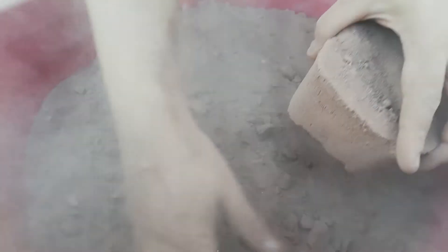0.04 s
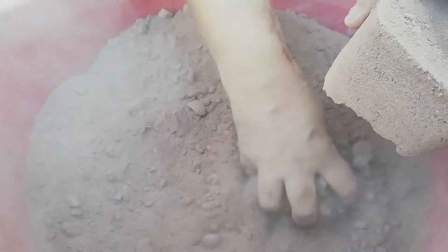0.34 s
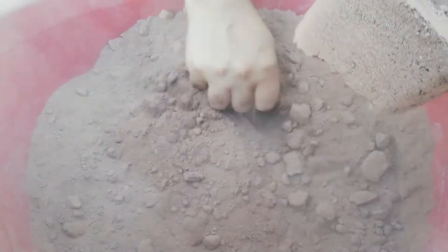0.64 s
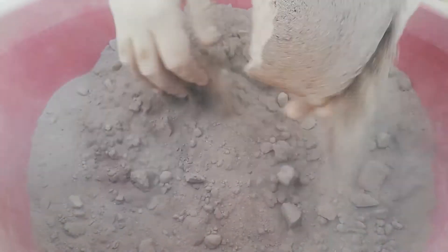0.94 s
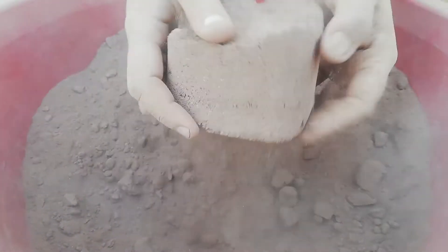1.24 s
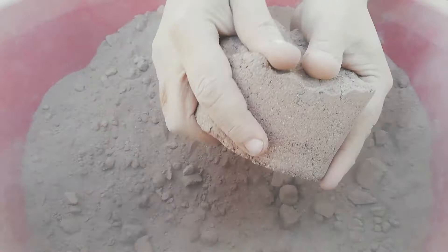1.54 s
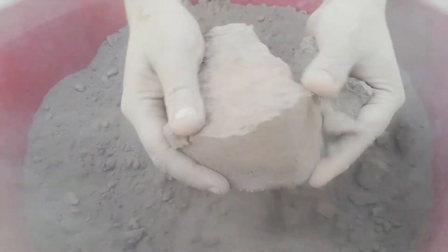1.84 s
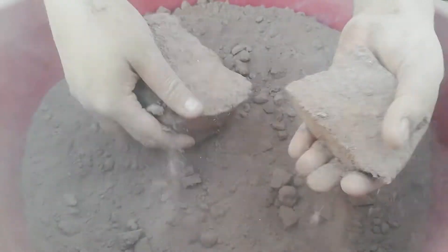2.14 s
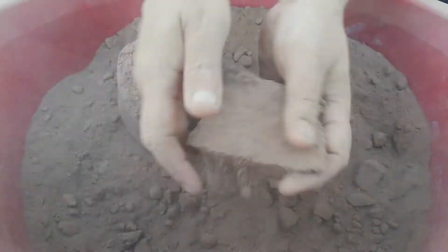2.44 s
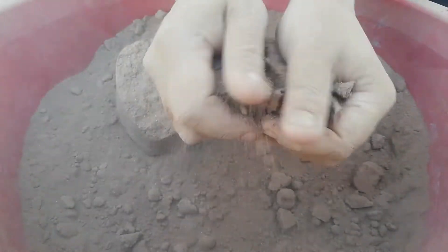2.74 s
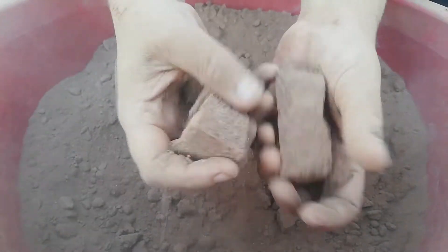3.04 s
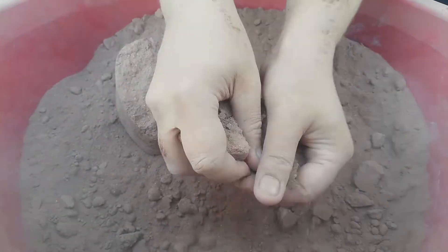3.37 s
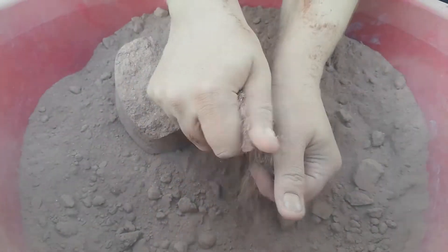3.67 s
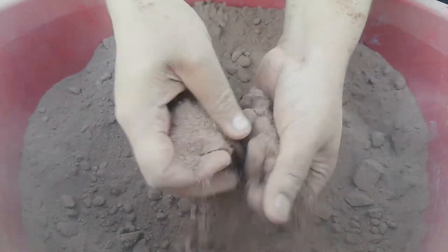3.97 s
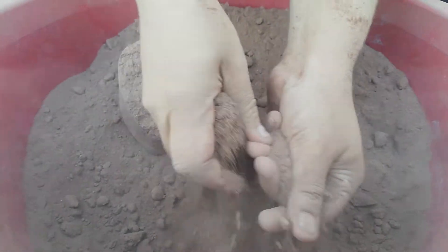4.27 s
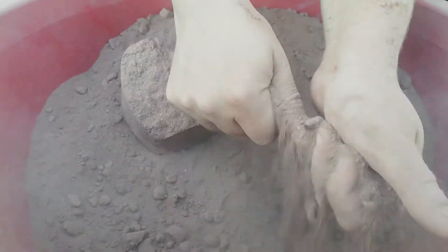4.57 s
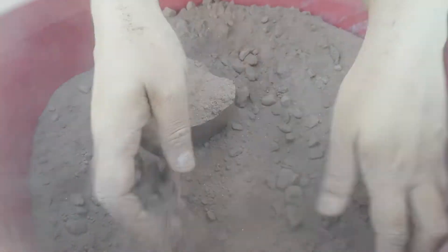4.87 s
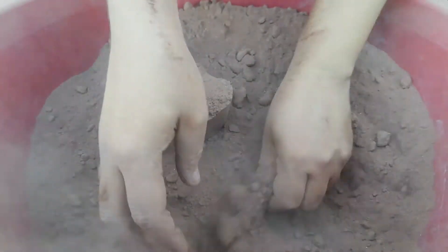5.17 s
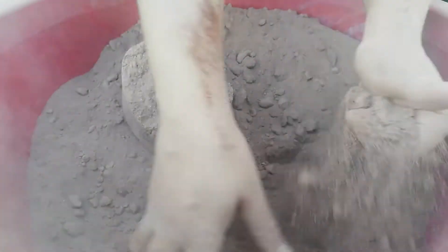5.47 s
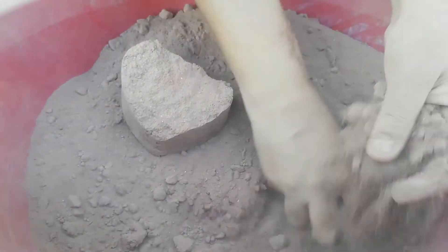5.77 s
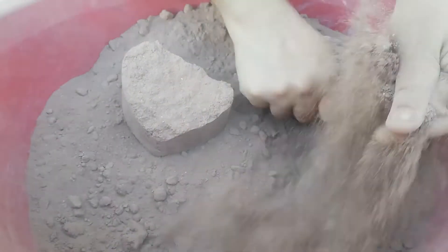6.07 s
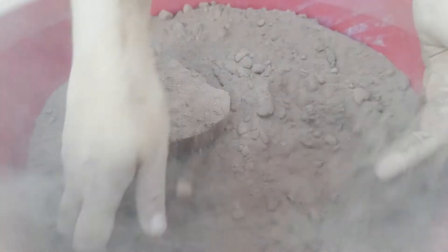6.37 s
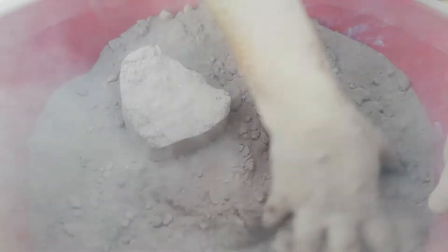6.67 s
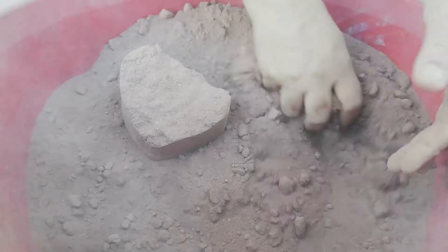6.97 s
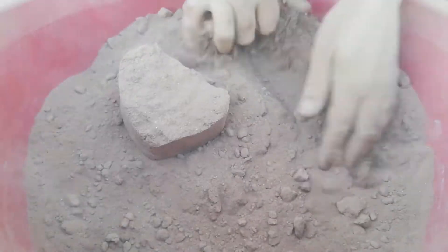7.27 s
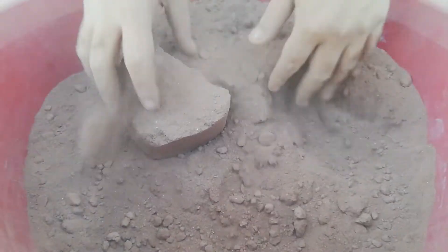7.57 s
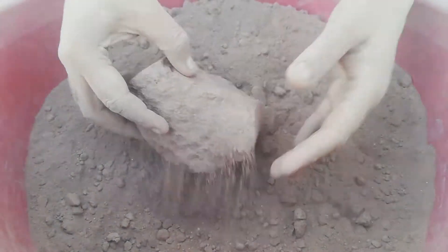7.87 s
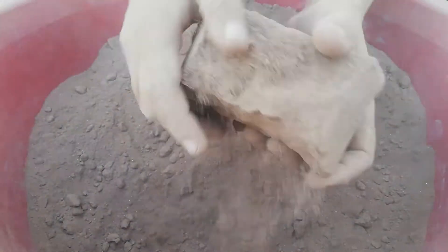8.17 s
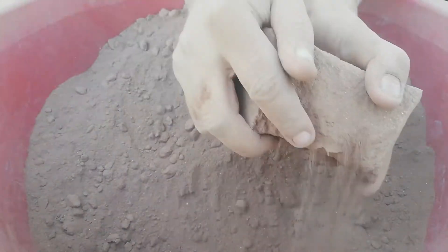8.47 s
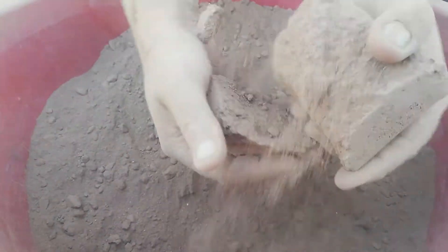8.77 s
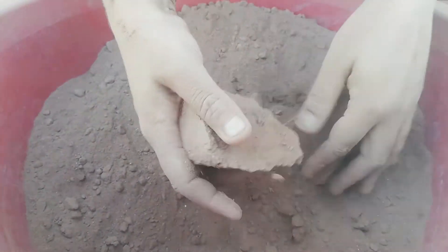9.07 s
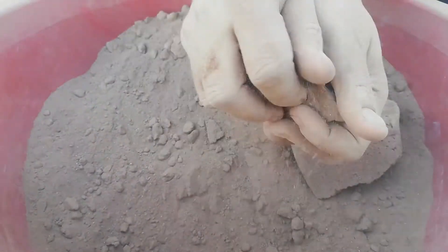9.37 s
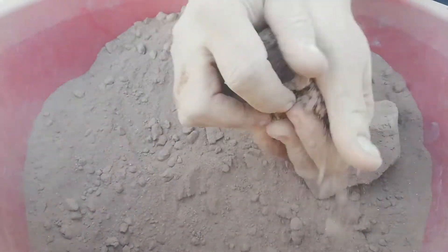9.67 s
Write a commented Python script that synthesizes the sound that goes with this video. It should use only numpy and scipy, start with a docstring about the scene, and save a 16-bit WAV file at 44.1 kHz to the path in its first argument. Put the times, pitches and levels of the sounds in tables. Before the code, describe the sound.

Hands snap and crumble blocks of dry dirt, with gritty crunching and powder trickling into a plastic tub of loose soil.

```python
"""Blocks of dry dirt break and crumble in two hands over a plastic tub of loose soil, in a small room.
Brittle fracture gives a snap, and the damped modes of the block give a short, hollow knock.
Lumps collapse in bursts; sand, grit and crumbs grind and trickle as thousands of random impacts.
Friction adds scrapes and a hiss of powder, and the tub rumbles dully when the hands lean into it.
The sound reaches the two microphone ports of a nearby phone."""
import sys
import numpy as np
from scipy import signal
from scipy.fft import rfft, irfft
from scipy.io import wavfile
from scipy.ndimage import uniform_filter1d

SR = 44100
rng = np.random.default_rng(int(sys.argv[2]) if len(sys.argv) > 2 else 0)


def persist_wave(psi):
    """Save psi, clipped to +-1, as 16-bit WAV."""
    counts = np.round(np.clip(psi, -1, 1) * 32767).astype(np.int16)
    wavfile.write(sys.argv[1], SR, np.atleast_2d(counts).T)


N = 437472
TIME = np.arange(N) / SR
HIT_TIME = np.arange(SR // 4) / SR  # seconds since a contact

# impact spectra of three grain sizes, fine to coarse: frequency_hz, level_db
SAND_SPECTRUM = [(3200, -51), (4600, -5), (5600, -3.5), (7000, -1), (8500, 0), (9900, -6), (12000, -7),
                 (15500, -16.5)]
GRIT_SPECTRUM = [(1200, -0.5), (1700, -8.5), (2100, 0.5), (2500, 1), (3100, 6), (4300, 5), (5200, -1.5),
                 (7000, -5)]
CRUMB_SPECTRUM = [(250, -6.5), (420, -4.5), (660, -8.5), (820, -3), (1150, 1.5), (1500, 0), (1900, -1.5),
                  (2800, -10)]


def undb(db):
    """Amplitude grows tenfold for every 20 dB."""
    return 10 ** (np.asarray(db) / 20)


def curves(table):
    """Linear interpolation in time gives each column a value per sample."""
    times, *columns = np.transpose(table)
    return [np.interp(TIME, times, column) for column in columns]


def gains(spectrum, size):
    """Interpolation in log frequency gives each bin a gain."""
    hz, db = np.transpose(spectrum)
    return undb(np.interp(np.log(np.fft.rfftfreq(size, 1 / SR) + 1e-9), np.log(hz), db))


def colour(x, spectrum):
    """Spectral shaping that falls away beyond its ends and conserves the power of white noise."""
    gain = gains([(spectrum[0][0] / 2, -70), *spectrum, (spectrum[-1][0] * 2, -70)], N)
    return irfft(rfft(x) * gain / np.sqrt(np.mean(gain ** 2)), N)


def noise(size, correlation):
    """Partial coherence: left and right noise have a share of their power in common."""
    white = rng.standard_normal((3, size))
    return np.sqrt(correlation) * white[0] + np.sqrt(1 - correlation) * white[1:]


def band(hz, width_hz, correlation):
    """Modulation shifts low-passed noise to a band whose centre may move; rms 1."""
    slow = signal.sosfilt(signal.butter(2, width_hz / 2, fs=SR, output="sos"), noise(N, correlation))
    return slow / slow.std() * np.sqrt(2) * np.cos(2 * np.pi * np.cumsum(hz * np.ones(N)) / SR)


def wander(rate_hz):
    """Random modulation: straight ramps between Gaussian values."""
    hold = int(SR / rate_hz)
    return 0.93 * uniform_filter1d(np.repeat(rng.standard_normal(N // hold + 1), hold), hold)[:N]


def add(out, start_s, sound):
    """Superposition: a sound joins the mix at its start time."""
    i = max(int(start_s * SR), 0)
    out[:, i:i + sound.shape[-1]] += sound[..., :N - i]


def stroke(length_s, swell_db, attack_s, release_s):
    """Envelope of a hand movement: linear attack, a hold that swells or fades, exponential release."""
    t = np.arange(int((length_s + 6 * release_s) * SR)) / SR
    hold = undb(swell_db * (np.minimum(t / length_s, 1) - .5))
    return np.minimum(t / attack_s, 1) * hold * np.exp(-np.maximum(t - length_s, 0) / release_s)


def grains(rate_hz, spread_db, decay_s, correlation, rise_s=0.00033):
    """Shot noise of mean power 1: brief random contacts, with a few large ones as the spread widens."""
    size = undb(spread_db * np.minimum(rng.exponential(size=N), 5.5))
    energy = (rng.random(N) < rate_hz / SR) * size ** 2
    for seconds in (decay_s, rise_s):
        energy = signal.lfilter([1], [1, -np.exp(-2 / (seconds * SR))], energy)
    return np.sqrt(energy / (uniform_filter1d(energy, SR // 10) + 1e-9)) * noise(N, correlation)


def burst(decay_s, correlation, rise_s=.00006):
    """A transient of unit energy: noise rises quickly and decays exponentially."""
    envelope = np.exp(-HIT_TIME / decay_s) * (1 - np.exp(-HIT_TIME / rise_s))
    x = envelope * noise(len(HIT_TIME), correlation)
    return x / np.sqrt(np.sum(x ** 2, axis=1, keepdims=True))


def ring(modes, skew_rad):
    """Free vibration: a sum of damped modes, each out of phase between the two ports."""
    phases = skew_rad * (1 + rng.standard_normal(len(modes)) / 2)
    return sum(undb(db) * np.exp(-np.log(1000) * HIT_TIME / t60_s)
               * np.sin(2 * np.pi * hz * HIT_TIME - np.array([[0], [phase]]))
               for (hz, db, t60_s), phase in zip(modes, phases))


def far_port(x, lag_samples=13):
    """Arrival-time difference: the right port hears a little later."""
    return np.array([x[0], np.roll(x[1], lag_samples)])


def hiss(level_db=-73):
    """Noise floor: a faint, even hiss lies under the quietest moments."""
    return undb(level_db) * colour(noise(N, correlation=0), [(300, 10), (2000, 18), (9000, -68), (15500, 2)])


def room(x, t60_s=0.25, tail_db=-11.5, cutoff_hz=3500):
    """Reverberation: reflections from near walls merge into a short, dull tail."""
    tail = burst(t60_s / np.log(1000), correlation=0.095, rise_s=0.00067)
    tail = signal.lfilter(*signal.butter(1, cutoff_hz, fs=SR), tail)
    return undb(tail_db) * signal.fftconvolve(x, tail, axes=1)[:, :N]


def tub_levels():
    """Incoherent sources add in power: pushes raise the tub's murmur and rumble, returned in dB."""
    # murmur of settling soil, and deep rumble between pushes: time_s, level_db
    settling = [(0, -63), (1.1, -67), (1.7, -68), (2, -58.5), (3.7, -65), (4.5, -67.5), (5.1, -59.5),
                (5.7, -69), (6.1, -53), (6.5, -64.5), (7, -57.5), (7.7, -65), (8, -52), (8.3, -60.5),
                (9.1, -67.5), (9.9, -58)]
    rumble = [(0, -63.5), (1.7, -65), (4.4, -65), (5.6, -63.5), (7.3, -69), (8.1, -68.5), (9.9, -66.5)]
    # hands leaning into the tub: start_s, length_s, murmur_db, rumble_db, swell_db
    pushes = [(.55, 0.44, -66.5, -61.5, 2), (2.11, 0.22, -61, -57.5, 3), (2.541, 0.37, -52, -51, 2.5),
              (2.957, 0.56, -52.5, -57, -14.5), (3.993, .4, -58.5, -52.5, -16)]
    power = undb(curves(settling) + curves(rumble)) ** 2
    for start_s, length_s, murmur_db, rumble_db, swell_db in pushes:
        envelope = stroke(length_s, swell_db, attack_s=0.019, release_s=0.02)
        add(power, start_s, (undb([[murmur_db], [rumble_db]]) * envelope) ** 2)
    return 10 * np.log10(power)


def tub(murmur_gain_db=2, rumble_gain_db=3, bump_gain_db=-6):
    """Forced and free vibration: shifting soil murmurs, and bumps ring the modes of the loaded tub."""
    # spectra of the murmur and the rumble: frequency_hz, level_db
    murmur_spectrum = [(50, -13), (85, -2), (115, 2), (200, 4.5), (290, -2), (390, -5.5), (550, -23.5),
                       (1000, -17.5)]
    rumble_spectrum = [(12, -42), (30, -0.5), (60, -2.5), (85, -5), (140, -11)]
    # modes of the loaded tub: frequency_hz, level_db, t60_s
    tub_modes = [(33, -61, 0.12), (64.4, -9.5, 0.36), (105.6, 3.5, 0.22), (161.8, 1, 0.32),
                 (194.6, 3.5, 0.124), (257, -5.5, 0.25)]
    # dull bumps against it: start_s, level_db, contact_s
    bumps = [(.888, -15.5, 0.022), (2.558, -37, .0036), (2.795, -27.5, 0.0032), (2.829, -28, .0043),
             (2.976, -28.5, 0.0014), (2.999, -26.5, 0.0018), (3.086, -34, 0.0038), (3.115, -28.5, 0.0047),
             (3.55, -29, 0.018), (4.01, -30.5, 0.0087), (4.127, -33, 0.0015), (4.183, -33.5, 0.0012),
             (7.809, -34, 0.0062)]
    murmur_db, rumble_db = tub_levels()
    soil = grains(rate_hz=900, spread_db=2, decay_s=0.0017, correlation=0.94)
    out = colour(soil, murmur_spectrum) * undb(murmur_db + murmur_gain_db)
    out += colour(noise(N, correlation=1), rumble_spectrum) * undb(rumble_db + rumble_gain_db)
    onset = 1 - np.exp(-HIT_TIME / 0.0015)
    for start_s, level_db, contact_s in bumps:
        detune = 1 + 0.049 * rng.standard_normal(len(tub_modes))
        # a long, soft contact barely excites the upper modes and shortens the ring
        modes = [(hz * d, db - 20 * np.log10(1 + (hz * contact_s) ** 2), t60 / np.hypot(1, 100 * contact_s))
                 for (hz, db, t60), d in zip(tub_modes, detune)]
        add(out, start_s, undb(level_db + bump_gain_db) * ring(modes, skew_rad=0.17) * onset)
    return out


def faint_ring(start_s=1.855, gain_db=-52, waver_db=13):
    """Amplitude-modulated modes: a thin, unsteady ring hangs on after the first block parts."""
    # modes of the ring: frequency_hz, level_db, t60_s
    modes = [(563, 0.5, 0.28), (1670, 1, 0.12), (2420, 2, 0.28), (2977, 8, 0.12)]
    out = np.zeros((2, N))
    add(out, start_s, undb(gain_db) * ring(modes, skew_rad=1) * (1 - HIT_TIME / HIT_TIME[-1]))
    return out * undb(waver_db * wander(rate_hz=90))


def scrapes(rough_db=2):
    """Stick-slip friction: fingers jerk through the dirt and excite the cavity of the palm."""
    # drags under a cupped hand: middle_s, length_s, level_db, cavity_hz, width_hz
    drags = [(0.217, 0.13, -53, 1015, 503), (0.57, 0.12, -54.5, 938, 405),
             (2.635, 0.022, -40.5, 3200, 2000), (3.304, 0.18, -52, 920, 200), (3.507, .05, -44, 4000, 596),
             (3.93, 0.023, -41.5, 2980, 1800), (7.116, 0.11, -51.5, 2970, 900),
             (9.546, 0.034, -37.5, 3220, 2230), (7.034, 0.19, -52.5, 1336, 222),
             (7.795, 0.067, -47.5, 1426, 304), (7.973, 0.094, -46, 1156, 300),
             (9.415, 0.038, -38, 1118, 330), (9.785, 0.037, -51, 1306, 400),
             (9.793, 0.056, -46, 2750, 2000)]
    jerks = undb(rough_db * wander(rate_hz=120))
    out = np.zeros((2, N))
    for middle_s, length_s, level_db, cavity_hz, width_hz in drags:
        envelope = np.exp(-2 * ((TIME - middle_s) / length_s) ** 2)
        out += undb(level_db) * envelope * band(cavity_hz, width_hz, correlation=0.28)
    return jerks * out


def sliding():
    """Cavity resonance: the gap between two sliding faces picks a moving band from the powder's hiss."""
    # course of the slide: time_s, level_db, resonance_hz
    slide = [(3.13, -51, 4330), (3.165, -33.5, 4390), (3.22, -38, 4800), (3.29, -38, 7400),
             (3.34, -28.5, 7080), (3.39, -28.5, 5480), (3.43, -29.5, 6800), (3.47, -31.5, 7800),
             (3.55, -47, 8500)]
    level_db, resonance_hz = curves(slide)
    touching = (TIME > slide[0][0]) & (TIME < slide[-1][0])
    return touching * undb(level_db) * band(resonance_hz, width_hz=1800, correlation=0)


def powder_sizzle(x, shelf_hz=9800):
    """High shelving: the very top rises and dips with puffs of the finest powder."""
    # slow drift of the shelf: time_s, gain_db
    drift = [(0, -0.5), (1.2, -3.5), (3, -2), (5.2, -4), (7.6, -3), (8.15, -8), (9, -2.5), (9.9, 0)]
    # puffs, and one lull: start_s, length_s, lift_db
    puffs = [(3.142, 0.52, 6.5), (7.77, 0.19, 10), (9.537, 0.089, -10), (9.675, 0.14, 12)]
    lift = np.ones((1, N))
    for start_s, length_s, lift_db in puffs:
        add(lift, start_s, (undb(lift_db) - 1) * stroke(length_s, 0, attack_s=0.096, release_s=0.0078))
    top = signal.sosfiltfilt(signal.butter(4, shelf_hz, "high", fs=SR, output="sos"), x)
    return x + (undb(curves(drift)) * lift - 1) * top


def hand_shadow(x, depth_db=2.5):
    """Shadowing and reflection by the moving hands send soft peaks and dips through the spectrum."""
    frames = signal.stft(x, nperseg=256)[2]
    shade = uniform_filter1d(rng.standard_normal(frames.shape), size=70, axis=2)  # smooth in time
    shade = uniform_filter1d(shade, size=2, axis=1)  # and in frequency
    return signal.istft(frames * undb(depth_db * shade / shade.std()))[1][:, :N]


def grain_mix(sand_db, coarse_db, grit_lift_db=0, grit_follows=0.26):
    """Size distribution as gains of sand, grit and crumbs; coarse_db is crumbs over sand."""
    return undb(sand_db + np.array([[0], [grit_lift_db + grit_follows * coarse_db], [coarse_db]]))


def flow_levels():
    """Rubs, pours and trickle add in power, giving levels of sand, grit and crumbs in dB."""
    # loose dirt trickling between strokes: time_s, sand_db
    trickle = [(0, -61.5), (.9, -63), (1.4, -65), (2.1, -60.5), (2.8, -63), (2.95, -78), (3.1, -64.5),
               (3.65, -66), (4.4, -59.5), (6.5, -58.5), (7.4, -60.5), (8.7, -63.5), (8.92, -64),
               (9.12, -59.5), (9.25, -65.5), (9.9, -66)]
    # fingers and blocks rubbing off sand: start_s, length_s, sand_db, coarse_db, swell_db
    rubs = [(1.1, 0.14, -55, -25, 5), (1.215, .14, -45.5, -25, 2), (1.44, 0.064, -55, -28, 8),
            (1.505, 0.18, -42, -20, -6.5), (2.02, 0.17, -50, -7, 11), (2.226, 0.098, -45.5, -10.5, -14),
            (2.33, 0.16, -48.5, -11, 1), (3.145, .39, -38, -18, -5), (3.92, 0.21, -51.5, -1.5, -8),
            (4.17, 0.2, -44, -17, 8.5), (4.41, 0.24, -48.5, -8, -5.5), (4.645, 0.28, -46, -13, -12.5),
            (4.98, 0.11, -46, -17.5, 0), (5.14, 0.029, -47, -15, 4), (5.36, 0.054, -52.5, -7, 6),
            (5.465, 0.09, -48, -41, -6), (5.6, 0.038, -52.5, -35, 7), (5.68, 0.23, -59.5, -25, 4),
            (6.93, 0.21, -51, -6, -8), (7.25, .07, -56, -6, -2), (8.96, 0.13, -51.5, -28, 3)]
    # handfuls raked up, crushed or poured: start_s, length_s, sand_db, coarse_db, swell_db
    pours = [(0, 0.096, -60, -3, -22), (.15, 0.1, -59, -3, -5), (.35, 0.096, -55.5, 1, 10),
             (.48, 0.15, -59, 5, 5.5), (.72, .15, -62.5, -2, 7), (1.72, .13, -55.5, 2.5, -9),
             (2.52, 0.11, -59, 5, -12), (2.64, 0.048, -53, -0.5, 9.5), (2.83, 0.061, -58.5, -1, -4),
             (5.18, 0.073, -56, 4.5, 6), (5.905, 0.055, -45, -5, 5.5), (6.02, 0.41, -57.5, 4, -9),
             (6.6, .26, -59.5, 1, 6), (7.48, 0.23, -68.5, 9.5, 10), (7.78, 0.39, -54.5, 7, -3.5),
             (8.16, 0.43, -62, 6.5, -2), (9.26, 0.059, -59, 3, 11), (9.305, 0.16, -50, 0.5, 6.5),
             (9.48, 0.22, -56, 6.5, -12.5), (9.69, 0.19, -57.5, 5.5, -3.5)]
    power = grain_mix(curves(trickle)[0], coarse_db=-4.5) ** 2
    for moves, grit_lift_db, attack_s, release_s in ((rubs, -0.5, 0.013, 0.01), (pours, 0, 0.0063, 0.02)):
        for start_s, length_s, sand_db, coarse_db, swell_db in moves:
            envelope = stroke(length_s, swell_db, attack_s, release_s)
            add(power, start_s, (grain_mix(sand_db, coarse_db, grit_lift_db) * envelope) ** 2)
    return 10 * np.log10(power)


def grinding(chip_share=0.18, slip_db=1.87, thin_flow_db=-58):
    """Granular flow: sand, grit and crumbs collide in small slips; chips tick across all three ranges."""
    sand_db, grit_db, crumb_db = flow_levels()
    # single grains stand out of a thin flow and merge in a thick one
    spread_db = np.maximum(2.6 - 0.06 * (sand_db - thin_flow_db), 0)
    chips = np.sqrt(chip_share) * grains(1100, 1.07 * spread_db, decay_s=.0008, correlation=.2)

    def stream(spectrum, rate_hz, decay_s, correlation):
        """Impacts of one grain size share a spectrum with the chips."""
        impacts = np.sqrt(1 - chip_share) * grains(rate_hz, spread_db, decay_s, correlation)
        return colour(chips + impacts, spectrum)

    sand = stream(SAND_SPECTRUM, rate_hz=7000, decay_s=.0005, correlation=.02) * undb(sand_db + 2.5)
    grit = stream(GRIT_SPECTRUM, rate_hz=3500, decay_s=.00046, correlation=.04) * undb(grit_db + 2)
    crumbs = stream(CRUMB_SPECTRUM, rate_hz=1400, decay_s=.003, correlation=.24) * undb(crumb_db + 1)
    return hand_shadow(far_port(sand + grit) + crumbs) * undb(slip_db * wander(rate_hz=55))


def soil_thud(x):
    """A soft impact holds mostly low frequencies."""
    # a lump hitting soil: frequency_hz, level_db
    thud_spectrum = [(100, -34), (220, 6.5), (380, 5), (600, -10), (1100, -19)]
    return colour(x, thud_spectrum)


def crushes(rise_s=0.0029):
    """Granular avalanche: a lump gives way in a rush of impacts that swells quickly and runs out."""
    # lumps collapsing: start_s, crunch_db, crumb_db, thud_db, decay_s
    collapses = [(0.164, -61, -45, -44, 0.014), (0.3286, -43.5, -45, -46, 0.02),
                 (1.527, -34.5, -66, -74, 0.029), (2.23, -34, -33, -32, 0.011),
                 (2.623, -45, -43.5, -36, 0.032), (3.922, -42, -41, -50, .016),
                 (4.08, -30.5, -66, -65, .013), (4.4364, -27, -36.5, -66, 0.02),
                 (4.651, -32, -44, -43, 0.018), (4.904, -29, -46, -40.5, 0.027),
                 (4.951, -31, -54, -42.5, 0.021), (5.756, -37.5, -69, -73, 0.013),
                 (5.9108, -31.5, -37, -59, 0.015), (7.787, -53, -73, -49, 0.034),
                 (8.963, -34, -49, -69, 0.0099), (9.323, -36.5, -38, -64, 0.034),
                 (9.414, -36, -40, -67, 0.022), (9.459, -35, -33, -65, 0.0087),
                 (9.714, -34.5, -44, -64, .01)]
    drives = np.zeros((3, N))
    for start_s, crunch_db, crumb_db, thud_db, decay_s in collapses:
        envelope = (1 - np.exp(-HIT_TIME / rise_s)) * np.exp(-(HIT_TIME / decay_s) ** 2)
        add(drives, start_s, undb([[crunch_db], [crumb_db], [thud_db]]) * envelope)
    crunch, crumbs, thuds = (drive * grains(rate_hz=5800, spread_db=0, decay_s=0.001, correlation=0.14)
                             for drive in drives)
    treble = undb(-5) * colour(crunch, SAND_SPECTRUM) + undb(-7) * colour(crunch, GRIT_SPECTRUM)
    return far_port(treble) + undb(-2) * colour(crumbs, CRUMB_SPECTRUM) + undb(-1) * soil_thud(thuds)


def cracks(tear_s=0.0016, block_t60_s=0.013, knock_rise_s=0.0019):
    """Brittle fracture: a crack ticks, tears on, sheds dust and rings the block; pieces clack and thud."""
    # blocks snapping and fragments striking: start_s, snap_db, knock_db, pitch_hz, thud_db
    fractures = [(0.2676, -37.5, -58, 1115, -59), (0.402, -46, -63, 1490, -53),
                 (.5778, -53, -42, 1250, -46), (1.723, -24, -28, 1260, -73),
                 (1.7404, -26, -25.5, 1370, -60), (1.761, -26.5, -26, 1120, -59),
                 (1.7683, -31, -33, 870, -42), (1.775, -25, -28.5, 880, -43),
                 (1.8059, -27.5, -31.5, 1595, -46), (1.8292, -34.5, -53, 1350, -42.5),
                 (1.852, -43, -42, 1180, -70), (2.141, -26.5, -29.5, 1150, -49),
                 (2.149, -43, -34.5, 1140, -51), (2.357, -18.5, -24, 1290, -56),
                 (2.3828, -30.5, -41, 1530, -56), (2.4218, -38, -38.5, 1190, -64),
                 (2.4546, -32.5, -38.5, 1060, -54), (2.7653, -39, -46, 1110, -46),
                 (2.8993, -18.5, -24.5, 1260, -61), (3.5775, -42, -57, 1390, -65),
                 (4.4194, -39, -34.5, 1210, -55), (4.504, -36, -36.5, 1177, -54),
                 (4.5234, -32, -35.5, 1220, -68), (4.577, -22, -33.5, 1270, -42),
                 (4.701, -25.5, -18.5, 1200, -38), (4.7205, -20, -32, 1080, -54),
                 (4.726, -27, -33, 1200, -48), (4.7647, -25.5, -33.5, 1190, -68),
                 (5.2273, -38, -28, 1440, -53), (5.3681, -41, -33, 780, -45),
                 (5.6132, -41, -44.5, 1200, -77), (6.008, -33.5, -38.5, 1170, -48),
                 (6.6447, -54, -41, 1170, -43), (7.3016, -37, -47, 1250, -76), (7.369, -28, -28, 1186, -66),
                 (7.3742, -28, -20.5, 1183, -76), (7.4427, -33, -48, 980, -55),
                 (7.5695, -35.5, -42.5, 1640, -45), (7.6617, -40, -44.5, 1640, -48.5),
                 (7.935, -31.5, -31.5, 1220, -38.5), (8.043, -32, -49, 1510, -54),
                 (8.1306, -30, -38.5, 1190, -64), (8.138, -33, -39, 1090, -57)]
    # modes of a block cupped in the hands: pitch_ratio, level_db
    block_modes = [(.7, -27), (.85, -17.5), (1, 11), (1.2, 4.5), (1.5, -26), (2.5, -5.5)]
    # spectra of a fracture and of hard pieces colliding: frequency_hz, level_db
    snap_spectrum = [(700, -69), (1500, 7.5), (2200, 10.5), (3100, 10.5), (4500, 8), (7000, 4),
                     (10000, -8.5), (15500, -14)]
    clack_spectrum = [(520, -18), (720, -8.5), (880, -5.5), (1170, 0), (1500, -12), (1900, -7), (2600, -23)]
    snaps, knocks, clacks, thuds = np.zeros((4, 2, N))
    tick = undb(-4) * (HIT_TIME == 0)
    onset = 1 - np.exp(-HIT_TIME / knock_rise_s)
    for start_s, snap_db, knock_db, pitch_hz, thud_db in fractures:
        dust = undb(-9) * burst(decay_s=0.0035, correlation=0)
        tear = burst(tear_s, correlation=0.075)
        add(snaps, start_s, undb(snap_db + 15) * (tick + tear + dust))
        detune = 1 + 0.023 * rng.standard_normal(len(block_modes))  # every piece has its own shape
        modes = [(pitch_hz * ratio * d, db, block_t60_s) for (ratio, db), d in zip(block_modes, detune)]
        add(knocks, start_s + tear_s / 2, undb(knock_db + 3) * onset * ring(modes, skew_rad=0.97))
        add(clacks, start_s, undb(knock_db + 15) * burst(decay_s=0.0046, correlation=0.46, rise_s=0.00063))
        add(thuds, start_s, undb(thud_db + 24) * burst(decay_s=0.0051, correlation=0.68))
    return far_port(colour(snaps, snap_spectrum)) + knocks + colour(clacks, clack_spectrum) + soil_thud(thuds)


def scene():
    """Superposition of the dirt, its reverberation, the tub below and the hiss."""
    dirt = powder_sizzle(grinding() + crushes()) + sliding() + scrapes() + cracks() + faint_ring()
    return dirt + room(dirt) + tub() + hiss()


def record(dry, cutoff_hz=15850):
    """Directivity: two ports face different ways and colour the sound apart; a low-pass cuts the top."""
    # level difference between the ports: frequency_hz, left_minus_right_db
    port_balance = [(200, 0), (520, -2.5), (700, 2.5), (900, 2.5), (1250, -2.5), (1700, -4), (2200, 3.5),
                    (3000, 6), (4300, 2.5), (5300, 12.5), (6800, 17.5), (8300, 11), (9800, 2),
                    (12000, -7.5), (15500, -3.5)]
    ratio = gains(port_balance, N)
    ports = np.array([ratio, np.ones_like(ratio)]) * np.sqrt(2 / (1 + ratio ** 2))
    lowpass = signal.ellip(10, .2, 70, cutoff_hz, fs=SR, output="sos")
    return signal.sosfilt(lowpass, irfft(rfft(dry) * ports, N))


dry = scene()
out = record(dry)
persist_wave(out)
```